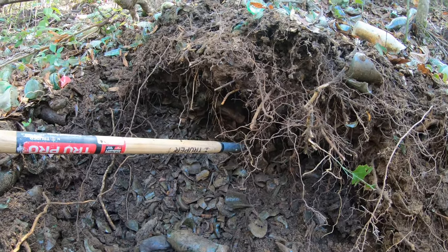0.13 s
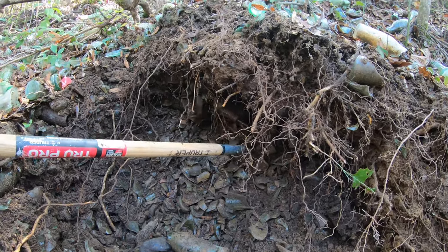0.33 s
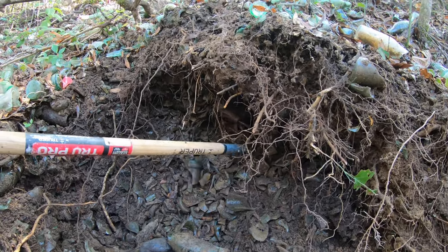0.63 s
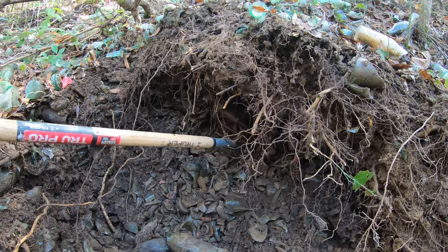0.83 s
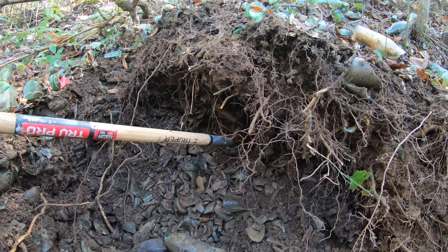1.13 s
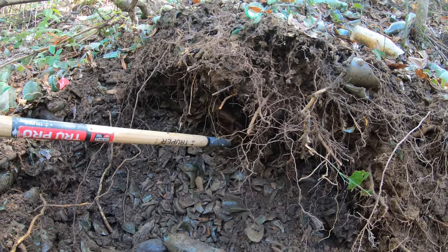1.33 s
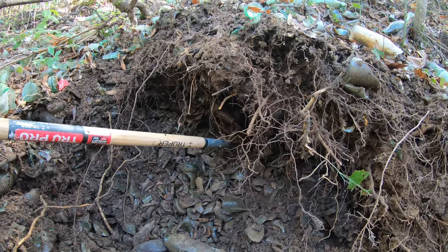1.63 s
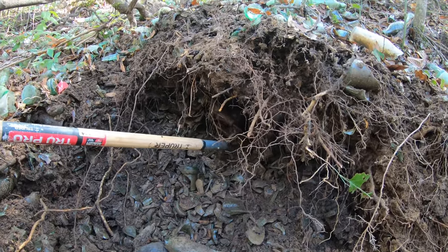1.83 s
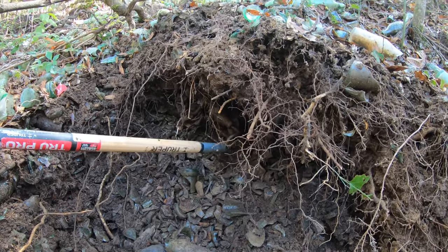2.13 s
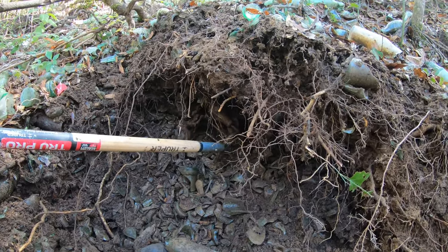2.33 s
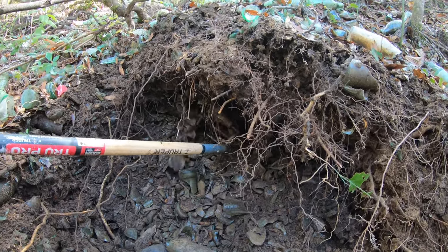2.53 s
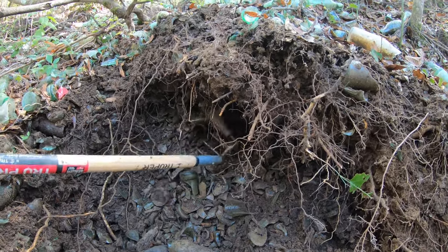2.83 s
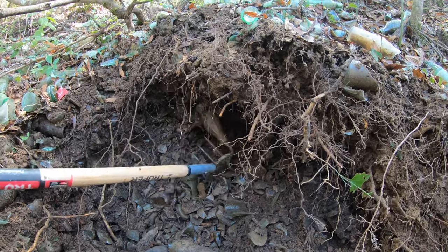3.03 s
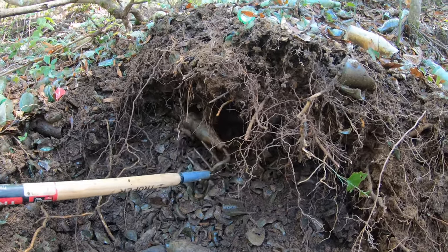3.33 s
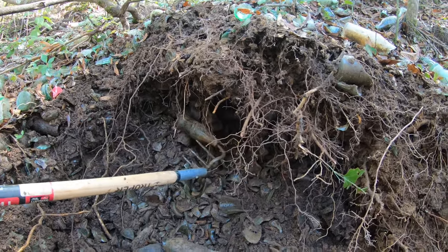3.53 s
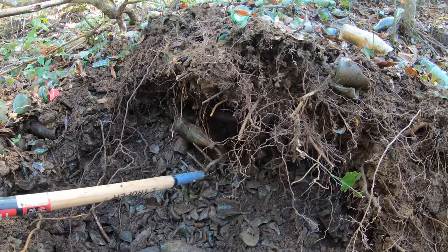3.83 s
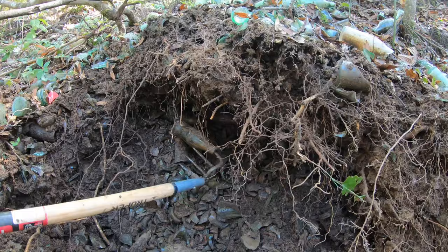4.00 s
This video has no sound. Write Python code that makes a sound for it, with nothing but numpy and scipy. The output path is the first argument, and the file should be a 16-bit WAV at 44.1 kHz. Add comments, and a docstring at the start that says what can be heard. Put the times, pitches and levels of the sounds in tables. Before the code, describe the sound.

Outdoors at an earth bank, a steel-tined hand tool works through soil full of broken glass. Light grit ticks lead to a dense burst of hard clinks around half a second, a sparser, quieter middle, then stronger scraping and cracking from two seconds on. Dull soil thuds sit beneath. A low passing engine drones faintly in the distance. Close stereo microphone, about a metre away, dry sound.

```python
"""Far traffic drones low in open air, and grit crunches as a steel-tined tool digs in a bank's hollow.
Soon glass shards crack against the steel, amid dull knocks; tines and shards ring, the handle thrums.
Traffic is shaped noise and gliding tones, grit is clumped grains, soil is dull pushes.
Each blow is a knock, a crack and a rattle; tines, shards and wooden handle ring in dying modes.
The hollow scatters the digging, and two close microphone ports hear it from about a metre."""
import sys
import numpy as np
from scipy import signal
from scipy.fft import rfft, irfft
from scipy.io import wavfile
from scipy.ndimage import uniform_filter1d

SR = 44100
rng = np.random.default_rng(int(sys.argv[2]) if len(sys.argv) > 2 else 0)


def boost_factor(decibels):
    """Convert a level in decibels to a linear amplitude factor."""
    exponent = np.asarray(decibels, float) / 20
    return 10 ** exponent


def log_audio(samples):
    """Write samples as a 16-bit WAV file to the path given in sys.argv[1]."""
    # one column per channel
    frames = np.atleast_2d(samples).T
    # limit to full scale, then quantise
    limited = np.clip(frames, -1, 1)
    pcm = np.round(limited * 32767).astype(np.int16)
    wavfile.write(sys.argv[1], SR, pcm)


N = 183676  # samples


def evened(x):
    """Normalisation: scales to rms 1."""
    return x / np.sqrt(np.mean(x ** 2) + 1e-20)


def smooth_noise(samples):
    """Low-pass noise: two running means leave slow random motion of rms 1."""
    return evened(uniform_filter1d(uniform_filter1d(rng.standard_normal(N), samples), samples))


def read(points, hz):
    """Interpolation: reads a spectrum on a log-frequency axis."""
    f, value = np.transpose(points)
    return np.interp(np.log(hz + 1), np.log(f + 1), value)


def colour(x, points, tilt_db=0):
    """Linear filtering: imposes a spectrum, tilted about 3.5 kHz by tilt_db per octave."""
    hz = np.fft.rfftfreq(len(x), 1 / SR)
    tilt = tilt_db * np.log2(np.clip(hz, 1100, 11000) / 3500)
    return irfft(rfft(x) * boost_factor(read(points, hz) + tilt), len(x))


def add(mix, s, sound):
    """Superposition: lays a sound into the mix at s seconds."""
    part = mix[max(round(s * SR), 0):][:len(sound)]
    part += sound[:len(part)]


# spectrum of the open air: f/Hz, relative spectral level/dB
AIR_SPECTRUM = [(15, -59), (30, -1), (80, -1.5), (160, -9.5), (300, -22.5), (550, -28), (1500, -24),
                (5000, -73), (16000, -83)]
# left-right coherence of the air: f/Hz, coherence/1
AIR_COHERENCE = [(60, 0.9), (3000, 0.085)]
AIR_DB = -48  # rms level


def air(patchy_db=2):
    """Diffuse field: traffic rumble and air, coherent between ports at low f only, slightly patchy."""
    frames, hz = N // 512 + 5, np.fft.rfftfreq(2048, 1 / SR)
    a, b, c, d, patches = rng.standard_normal((frames, 1025, 5)).T
    patches = evened(uniform_filter1d(uniform_filter1d(patches, 12, 0), 10, 1))
    same = np.clip(read(AIR_COHERENCE, hz), -1, 1)[:, None]
    left, other = a + 1j * b, c + 1j * d
    right = same * left + np.sqrt(1 - same ** 2) * other
    z = np.array([left, right]) * boost_factor(read(AIR_SPECTRUM, hz)[:, None] + patchy_db * patches)
    return boost_factor(AIR_DB) * evened(signal.istft(z, nperseg=2048, noverlap=1536)[1][:, :N])


def drone(rows, waver_db=2.6):
    """Frequency modulation: a sine whose phase integrates a gliding pitch, fading outside its span."""
    s, hz, db = np.transpose(rows)
    t = np.arange(N) / SR
    fade = np.clip(np.minimum(t - s[0], s[-1] - t) / 0.035 + 1, 0, 1)
    turns = np.cumsum(np.interp(t, s, hz)) / SR + rng.random()
    tone = np.sqrt(2) * np.sin(2 * np.pi * turns)
    return tone * fade * boost_factor(np.interp(t, s, db) + waver_db * smooth_noise(1800))


# two passing engines, a list of rows for each: t/s, firing f/Hz, level/dB before waver
ENGINES = [
    [(0, 64.94, -44), (.46, 66.47, -34), (1.1, 71.84, -41), (1.35, 76.45, -38), (1.6, 78.3, -46),
     (2, 77.65, -47.5), (3, 68, -63)],
    [(3.35, 55.8, -56), (3.5, 54.9, -46.5), (3.8, 55.6, -41), (3.97, 58.5, -33.5), (4.165, 60.3, -34)],
]
# a fainter drone: t/s, f/Hz, level/dB before waver
HUM = [(0, 149.6, -61), (.7, 151, -57.5), (.9, 152, -48), (1.35, 151.5, -64), (2, 145.7, -61),
       (2.7, 149, -50), (3.3, 150.7, -64.5), (4.165, 145.9, -52)]


def drones():
    """Periodic sources: each engine sounds at its firing rate, beside one fainter tone."""
    low = sum(drone(rows) for rows in ENGINES) + drone(HUM, waver_db=3.0)
    return low * boost_factor(np.array([[-.3], [.3]]))  # slightly stronger on the right


# the tool moves in jerks: t/s of full force, hold/s, crunch level/dB, soil thud over crunch/dB
JERKS = [(0, 0.0053, -44.5, -7.5), (0.09, 0.004, -44.5, -14), (0.19, 0.029, -46, -18),
         (0.246, 0.026, -37, -11.5), (0.336, 0.044, -42, -11), (0.437, 0.037, -42, -12.5),
         (0.493, 0.023, -32.5, -13.5), (0.541, 0.15, -37, -16), (0.779, 0.056, -41, -17),
         (0.863, 0.032, -37.5, -15.5), (0.989, 0.049, -44.5, -18), (1.107, 0.0088, -40, -18),
         (1.159, 0.12, -44, -23), (1.322, 0.031, -50.5, -13), (1.481, 0.096, -48.5, -14),
         (1.662, 0.0081, -48.5, -30), (1.756, 0.043, -48.5, -24), (1.828, 0.019, -45, 0),
         (1.858, 0.0065, -41, -0.5), (1.94, 0.024, -41, -16), (2.108, 0.032, -30.5, -10),
         (2.241, 0.026, -37.5, -11.5), (2.313, 0.086, -45.5, -16), (2.394, 0.017, -33, -12.5),
         (2.499, 0.0053, -37, -18), (2.574, 0.0049, -40, -11), (2.66, 0.098, -31.5, -18.5),
         (2.769, 0.05, -33.5, -13.5), (2.798, 0.093, -39.5, -23), (2.947, 0.24, -40.5, -15.5),
         (3.16, 0.065, -42.5, -18), (3.251, 0.035, -38.5, -23), (3.375, 0.021, -34.5, -24),
         (3.43, 0.12, -48.5, -6), (3.589, 0.043, -42, -28), (3.682, 0.03, -36, -11.5),
         (3.773, 0.21, -41.5, -16), (4.001, 0.065, -51, -24), (4.139, 0.0051, -45.5, -22)]
RISE_DB_PER_S, FALL_DB_PER_S = 354, 283
REST_DB, REST_THUD_DB = -64, -88  # between jerks the grit trickles on


def stroke():
    """Stick-slip: force rises, holds, falls; powers add into crunch dB and thud dB per sample."""
    s, hold, db, soil_db = np.transpose(JERKS)[:, :, None]
    t = np.arange(0, N + 32, 32) / SR
    rise = RISE_DB_PER_S * np.maximum(s - t, 0)
    fall = FALL_DB_PER_S * np.maximum(t - s - hold, 0)
    force_db = db - rise - fall
    levels = []
    for jerks_db, rest_db in ((force_db, REST_DB), (force_db + soil_db, REST_THUD_DB)):
        power = (boost_factor(jerks_db) ** 2).sum(0) + boost_factor(rest_db) ** 2
        levels.append(np.interp(np.arange(N) / SR, t, 10 * np.log10(power)))
    return levels


# filter for the grit: f/Hz, relative spectral level/dB
GRIT_SPECTRUM = [(240, -75), (400, -15), (839, -8.5), (1010, -8.5), (1350, -11.5), (1930, -3.5), (3300, -3),
                 (7280, -7), (13500, -21.5), (16000, -36)]
BRIGHT_DB, BRIGHT_PER_DB = 0.28, 0.0333  # dB per octave at middling force, and its gain per dB of force
MID_FORCE_DB = -38


def crunch(full_grains_per_s=1900, spread_db=3.4, hiss=0.4, clump_db=2.2, sparse=.45):
    """Granular emission: grit slips in clumped random grains; force sets level and brightness."""
    db = stroke()[0]
    clumps = smooth_noise(300)
    dense = boost_factor(np.clip(sparse * (db + 35.0), -20, 3))  # light force slips in few separate ticks
    slips = rng.random(N) < dense * full_grains_per_s / SR
    size = boost_factor(spread_db * np.minimum(rng.exponential(1, N), 4)) * slips / np.sqrt(dense)
    kind, t, grains = rng.integers(0, 60, N), np.arange(512) / SR, np.zeros(N)
    for k, pitch in enumerate(rng.random(60)):
        hz = 900 * 14 ** ((k + pitch) / 60)
        chip = boost_factor(-60 * t / 0.0062) * np.sin(2 * np.pi * hz * t)  # a chip rings a few cycles
        tick = rng.standard_normal(512) * boost_factor(-60 * t / .004)
        grains += signal.oaconvolve(size * (kind == k), chip + 1.26 * tick)[:N]
    slip = (evened(grains) + hiss * rng.standard_normal(N)) * boost_factor(clump_db * clumps)
    hz, at, z = signal.stft(evened(colour(slip, GRIT_SPECTRUM)), SR, nperseg=256)
    bright = np.interp(at * SR, np.arange(N), BRIGHT_DB + BRIGHT_PER_DB * (db - MID_FORCE_DB))
    z *= boost_factor(np.log2(np.clip(hz, 700, 14000) / 3500)[:, None] * bright)
    return signal.istft(z, SR, nperseg=256)[1][:N] * boost_factor(db)


# filter for the soil: f/Hz, relative spectral level/dB
SOIL_SPECTRUM = [(90, -24), (170, 3), (260, 5.5), (380, 0), (520, -16.5), (900, -5), (1400, -30)]


def thud(lump_db=1.5, pushes_per_s=90, spread_db=2, rustle=.7):
    """Impulsive excitation: soil yields under the tines in random dull pushes amid a loose rustle."""
    lumps = smooth_noise(200)
    yields = (rng.random(N) < pushes_per_s / SR) * rng.choice([-1, 1], N)
    pushes = boost_factor(spread_db * np.minimum(rng.exponential(1, N), 3)) * yields
    rustling = rustle * rng.standard_normal(N) * boost_factor(lump_db * lumps)
    return evened(colour(evened(pushes) + rustling, SOIL_SPECTRUM)) * boost_factor(stroke()[1])


def hollow(x, t60=0.043, count=8):
    """Scattering off bank and roots: each spot in the hole answers with its own decaying noise tail."""
    spot = rng.integers(0, count, N // 512 + 1).repeat(512)[:N]
    tails = rng.standard_normal((count, 4096)) * boost_factor(-60 * np.arange(4096) / SR / t60)
    tails /= np.linalg.norm(tails, axis=1, keepdims=True)
    fed = uniform_filter1d((spot == np.arange(count)[:, None]) * 1., size=64, axis=1) * x
    return signal.oaconvolve(fed, tails, axes=1).sum(0)[:N]


# gain of the port difference: f/Hz, side gain over mid/dB
WIDTH = [(150, -24), (950, -7), (2400, -14.5), (4400, -18), (6800, -2), (8600, -1.5), (13000, -4.5)]
# steady pull to the left port, negative to the right: f/Hz, pull/1
LEAN = [(2000, 0.12), (6500, 0.03), (10000, -0.33), (14000, -0.14)]


def port_difference(x):
    """Phase difference: shards lie at ever other angles, so the ports differ by a drifting phase."""
    hz, at, z = signal.stft(x, SR, nperseg=128)
    turn = rng.standard_normal((len(at), len(hz), 2)) @ [1, 1j]
    turn = uniform_filter1d(uniform_filter1d(turn, 8, 0), 5, 1).T
    z = z * (turn / abs(turn) + read(LEAN, hz)[:, None])
    return colour(signal.istft(z, SR, nperseg=128)[1][:N], WIDTH)


# the clearest blows: glass cracks, dull knocks and low pushes:
# t/s, peak level/dB, strongest f/Hz, brightness/(dB per octave)
BLOWS = [(0.1426, -31, 2630, -7), (0.1728, -25, 7140, -5.5), (0.1997, -19.5, 3740, -6.5),
         (0.3331, -22.5, 1540, -6.5), (0.372, -21.5, 2700, -19.5), (0.411, -25.5, 3000, -13),
         (0.4333, -16, 3160, -1), (0.4888, -9.5, 4440, -2.5), (0.555, -15.5, 2120, -14),
         (0.5719, -4, 4000, -2), (0.582, -17, 4500, -2), (0.595, -14, 4050, -2), (0.6253, -7, 5900, 0),
         (0.6316, -21, 2380, -8), (0.646, -12.5, 5950, 0), (0.668, -16.5, 3040, -5),
         (0.719, -16.5, 3240, 4), (.76, -36, 3560, -6), (0.8554, -23, 2760, -21), (0.902, -24, 2600, -6),
         (0.935, -14.5, 6140, -0.5), (0.939, -22, 3150, 1), (1.009, -29, 1970, -12.5),
         (1.029, -34, 3500, -6), (1.038, -30, 2090, -9), (1.089, -31, 3300, -13), (1.103, -27.5, 1140, -18),
         (1.115, -26, 2660, -10.5), (1.127, -29, 2500, -10), (1.148, -16, 2450, -14.5),
         (1.1585, -5.5, 3120, 9), (1.2162, -27, 2700, -11), (1.2274, -22, 3440, -4), (1.301, -29, 2880, 8),
         (1.322, -22.5, 2780, 1), (1.492, -36, 4460, -1), (1.508, -31, 920, -2), (1.524, -33.5, 1820, -2),
         (1.568, -27, 4270, -7), (1.597, -32.5, 1840, -1), (1.686, -28, 1620, -0.5),
         (1.74, -28, 4240, -0.5), (1.798, -28.5, 2070, -16), (1.816, -26.5, 2017, -13.5),
         (1.8305, -26.5, 3180, -11), (1.8463, -22.5, 3380, -13), (1.8704, -18.5, 1850, 3),
         (1.952, -28.5, 4070, -17), (2.0402, -28.5, 3793, -7.5), (2.0767, -21.5, 3050, -15),
         (2.1642, -21, 3700, -9.5), (2.222, -19, 2135, -10.5), (2.241, -24, 1010, -3),
         (2.3586, -19.5, 3740, 0), (2.3977, -17, 3424, -2), (2.428, -14, 2060, -5.5),
         (2.4798, -12.5, 2770, 1.5), (2.4931, -13.5, 3940, 3), (2.498, -15, 3340, 5),
         (2.5692, -25.5, 2750, 0), (2.5848, -7, 3660, 1), (2.618, -17.5, 2940, -10.5),
         (2.633, -17.5, 3520, 8), (2.669, -21, 2040, -10.5), (2.693, -26, 960, -16),
         (2.714, -15.5, 5220, -2.5), (2.7823, -14.5, 1010, -16), (2.7825, -21, 2060, 7),
         (2.8338, -7, 3530, -2), (2.892, -20.5, 6640, 4), (2.952, -6.5, 3330, -1),
         (2.9853, -13.5, 2630, 0.5), (3.026, -23.5, 3490, -13), (3.06, -12.5, 4400, -7.5),
         (3.088, -26.5, 710, -11), (3.098, -6.5, 2900, -4.5), (3.118, -17, 2930, -2.5),
         (3.1237, -16, 5150, 2), (3.127, -16, 3800, -2), (3.136, -15, 7400, 2), (3.197, -24, 7840, 6),
         (3.33, -22, 4470, 7), (3.367, -17, 3000, -9), (3.383, -19.5, 2030, 15), (3.429, -17.5, 6800, 1.5),
         (3.4425, -22, 3420, 4), (3.4457, -14.5, 2200, -11.5), (3.449, -24, 770, -12),
         (3.477, -18.5, 2860, -8.5), (3.4905, -25, 4120, 4), (3.544, -26, 4270, 0),
         (3.5537, -22, 2980, -11), (3.5797, -3.5, 3540, -7.5), (3.617, -19, 2050, -6),
         (3.625, -25, 900, -8), (3.6408, -20.5, 4930, -3), (3.6727, -14, 3300, -3), (3.682, -9, 4550, 5),
         (3.7275, -14.5, 2130, 5), (3.7314, -14.5, 1864, -14), (3.7323, -7.5, 4800, -1.5),
         (3.747, -19, 3700, 3), (3.805, -16, 8250, 5), (3.848, -23, 3540, 0), (3.944, -23, 3640, 2.5),
         (4.0014, -26, 3300, -4), (4.0125, -26, 2760, -4)]
# filter for the crack: f/Hz, relative spectral level/dB
CRACK_SPECTRUM = [(120, -48), (250, -24.5), (600, -28), (1080, -16), (1710, -9), (3190, 6), (9230, -3.5),
                  (16000, -27)]
CRACK_T60, SOFT_BLOW_DB = 0.018, -29  # s, for a soft blow of this level and no tilt
HARD_T60, DULL_T60 = -0.012, -0.0078  # log change of T60 per dB of blow, per dB/octave of brightness
KNOCK_PER_DB = 0.2  # harder blows knock more cleanly, dB per dB of blow


def blows(bump_db=5, bump_octaves=0.12, rattle_db=-26, rattle_t60=0.027, knock_db=6, knock_turns=6):
    """Impact: a knock of a few cycles at the blow's strongest pitch, a broad crack and a rattle."""
    out, t, hz = np.zeros(N), np.arange(4096) / SR, np.fft.rfftfreq(4096, 1 / SR)
    lead = 128 / SR  # s kept free ahead of the contact
    late = np.maximum(t - lead, 0)
    for s, db, top_hz, tilt_db in BLOWS:
        harder_db = db - SOFT_BLOW_DB
        t60 = CRACK_T60 * np.exp(HARD_T60 * harder_db + DULL_T60 * tilt_db)
        rattle = boost_factor(rattle_db - 60 * late / rattle_t60)
        shape = np.minimum(late / 0.00041, 1) * (boost_factor(-60 * late / max(t60, .003)) + rattle)
        noise = rng.standard_normal(4096)
        noise[132:136] += 5 * np.array([1, 1, -1, -1])  # the first contact is a sharp snap
        bump = boost_factor(bump_db * np.exp(-.5 * (np.log2((hz + 1) / top_hz) / bump_octaves) ** 2))
        crack = irfft(rfft(colour(noise * shape, CRACK_SPECTRUM, tilt_db)) * bump)
        onset = (1 - np.exp(-late * top_hz * 1.79)) ** 2
        knock = np.sin(2 * np.pi * top_hz * late) * boost_factor(-60 * late * top_hz / knock_turns) * onset
        blow = crack / abs(crack).max() + boost_factor(knock_db + KNOCK_PER_DB * harder_db) * knock
        add(out, s - lead, boost_factor(db) * blow / abs(blow).max())
    return out


def modes(rows, rise_turns=3):
    """Free vibration: each row sounds one exponentially dying sine after a rise of a few cycles."""
    out, t = np.zeros(N), np.arange(16384) / SR
    for s, db, hz, t60 in rows:
        rise = np.minimum(t * hz / rise_turns, 1)
        add(out, s, boost_factor(db - 60 * t / t60) * np.sin(2 * np.pi * hz * t) * rise)
    return out


# tines and shards that ring on after a blow: t/s, level/dB before the rise, f/Hz, T60/s
RINGS = [(.172, -30, 7450, 0.033), (.412, -29.5, 7430, .021), (.667, -7, 3580, 0.031),
         (.679, -12.5, 3570, 0.024), (.687, -18.5, 7400, 0.023), (2.952, -16, 9080, 0.019),
         (2.9725, -35, 7600, 0.066), (2.975, -20, 2710, .03), (2.9855, -14, 2880, 0.015),
         (2.973, -25.5, 1115, 0.064), (3.06, -30, 1090, 0.043), (3.059, -27, 7600, 0.031),
         (3.0985, -12, 7450, 0.02), (3.1355, -16, 7660, 0.049), (3.5765, -27, 4500, 0.014),
         (3.58, -15, 4140, 0.021), (3.58, -25, 9700, 0.007), (3.58, -20, 1077, 0.019),
         (3.593, -32, 4340, 0.05), (3.64, -22, 5100, 0.025), (3.731, -16.5, 1134, 0.031),
         (3.805, -15, 7480, 0.015)]


def tine_and_shard_rings():
    """Modal ringing: a struck tine or shard goes on at one of its own frequencies."""
    return modes(RINGS)


# narrow bands where the crunch is stronger: a tine singing while rubbed, or a trickle of grit:
# start t/s, length/s, f/Hz, bandwidth/Hz, gain/dB
STRONGER_BANDS = [(0.253, 0.038, 1790, 300, 10.5), (0.45, 0.077, 1780, 298, 10),
                  (0.779, 0.12, 2610, 500, 11), (0.786, 0.12, 1900, 350, 5.5),
                  (1.863, 0.02, 1860, 388, 20.5), (2.087, 0.094, 6530, 587, 2), (2.24, 0.045, 1910, 600, 4),
                  (3.864, 0.34, 3380, 899, 0)]


def strengthened(grit):
    """Resonant filtering: the crunch drives a band-pass, whose output is added back to it."""
    for start, length, hz, width, gain_db in STRONGER_BANDS:
        part = grit[round(start * SR):][:round(length * SR)]
        band = signal.lfilter(*signal.iirpeak(hz, hz / width, SR), part)
        add(grit, start, boost_factor(gain_db) * band * signal.windows.tukey(len(band), .4))
    return grit


# the wooden handle after a hard knock: t/s, level/dB before the rise, f/Hz, T60/s
THRUMS = [(1.89, -39.5, 240, 0.13), (2.76, -34, 230, 0.33), (3.446, -32, 235, 0.22),
          (3.58, -43, 244.7, 0.34)]


def handle_thrums():
    """Modal ringing: the knocked wooden handle thrums at a low frequency."""
    return modes(THRUMS)


def scene():
    """Superposition: digging in the hollow of a bank, heard by two close microphone ports."""
    dig = strengthened(crunch()) + blows() + tine_and_shard_rings()
    dig = dig + boost_factor(-11.0) * hollow(dig) + thud() + handle_thrums()
    side = port_difference(dig)
    return air() + drones() + dig + np.array([side, -side])


# treble colouring of the whole mix, with its upper cut-off: f/Hz, gain/dB
TREBLE = [(7400, -2), (8400, -8), (10000, 0.5), (11200, -7.5), (14300, -3.5), (15800, -7), (16600, -40)]


def treble_coloured(dry):
    """Linear filtering: one frequency response colours the treble of both channels and cuts its top."""
    return np.array([colour(port, TREBLE) for port in dry])


def top_cut(x):
    """Nothing passes above the cut-off."""
    return signal.sosfilt(signal.butter(12, 16480, fs=SR, output="sos"), x)


def record(dry):
    """Transmission chain: the whole scene passes through the treble colouring."""
    mix = treble_coloured(dry)
    return top_cut(mix)


dry = scene()
out = record(dry)
log_audio(out)
```